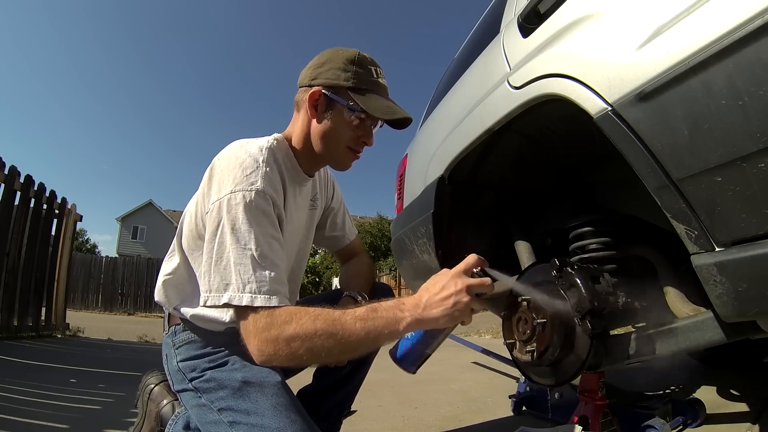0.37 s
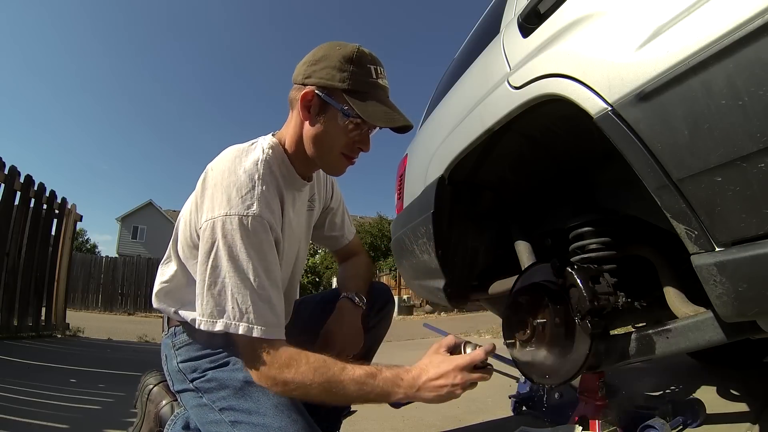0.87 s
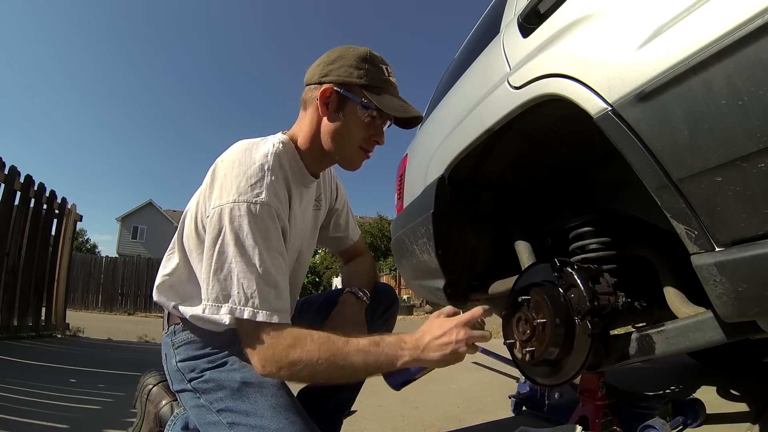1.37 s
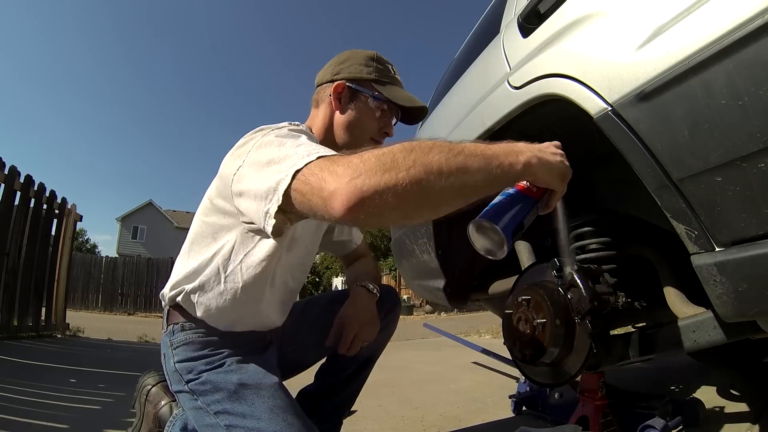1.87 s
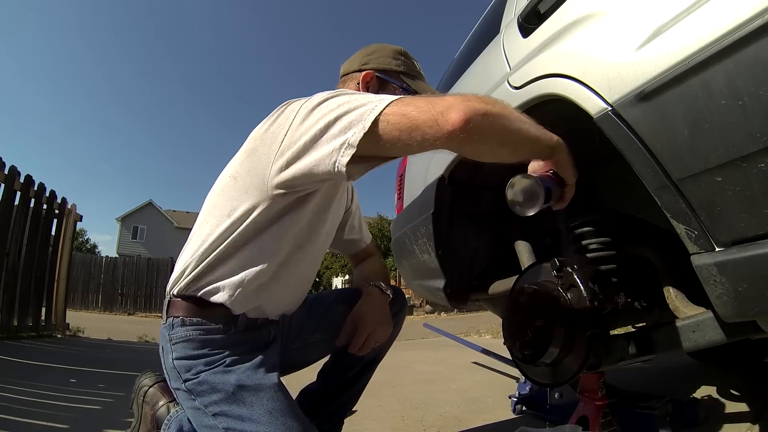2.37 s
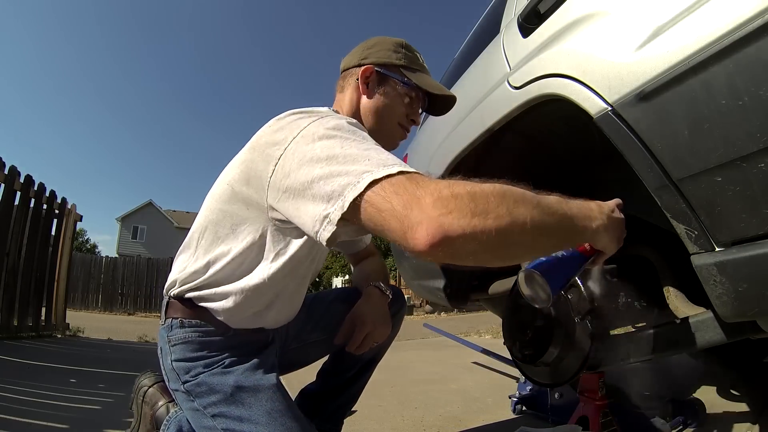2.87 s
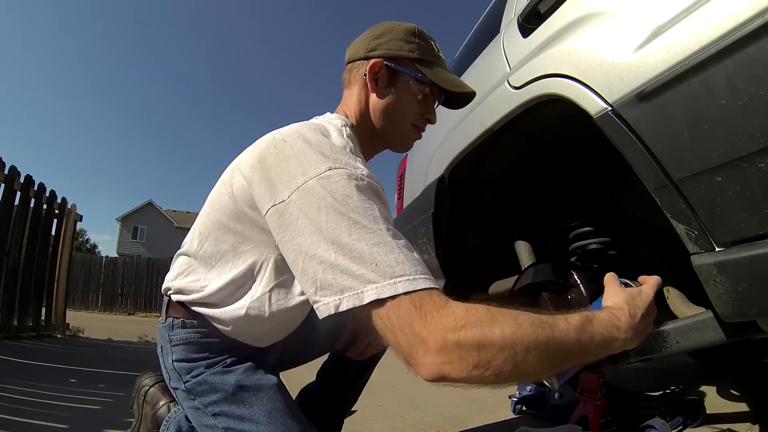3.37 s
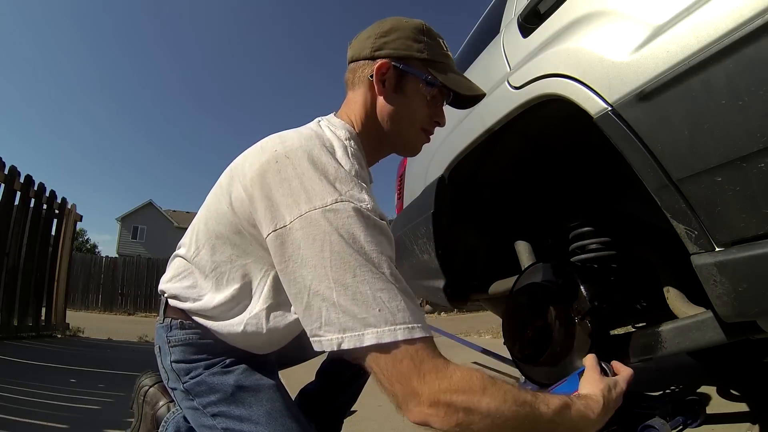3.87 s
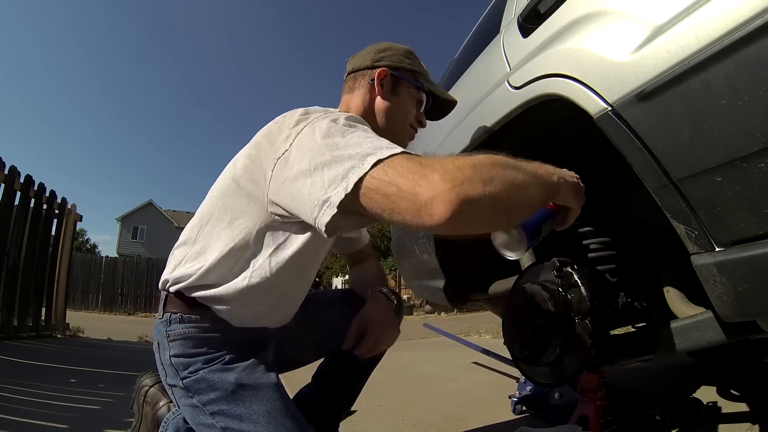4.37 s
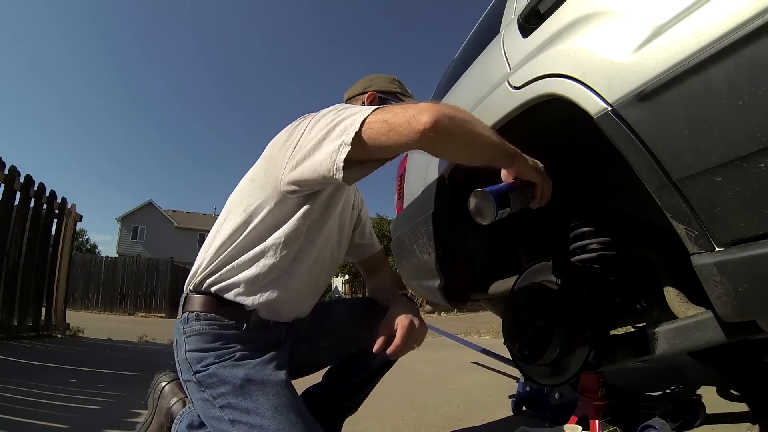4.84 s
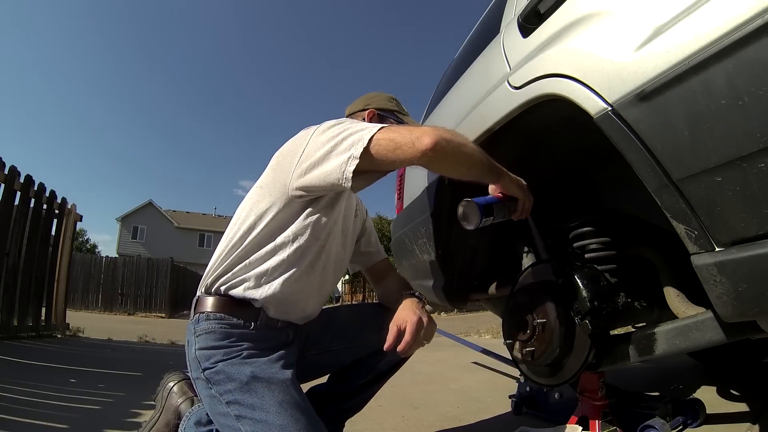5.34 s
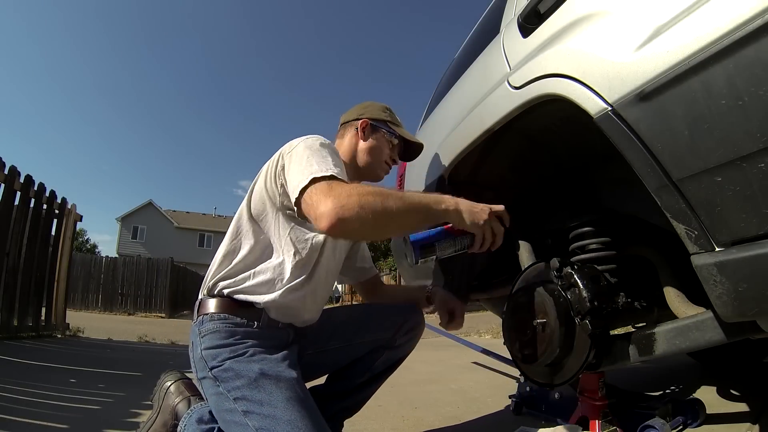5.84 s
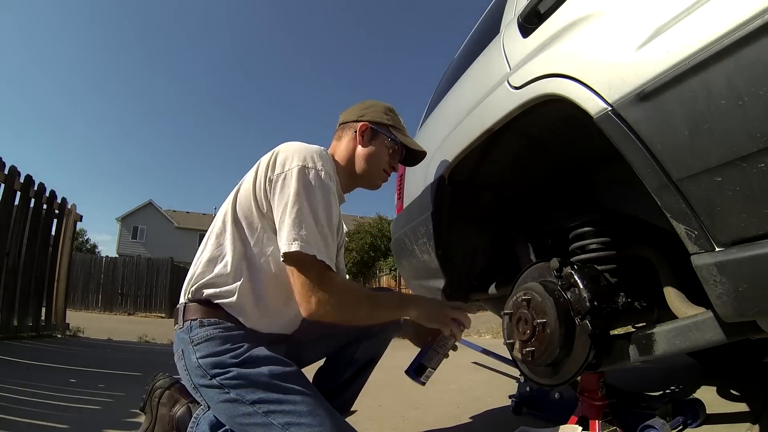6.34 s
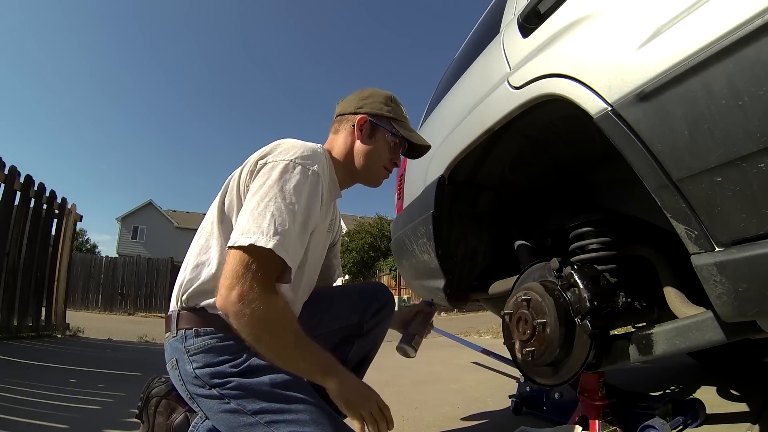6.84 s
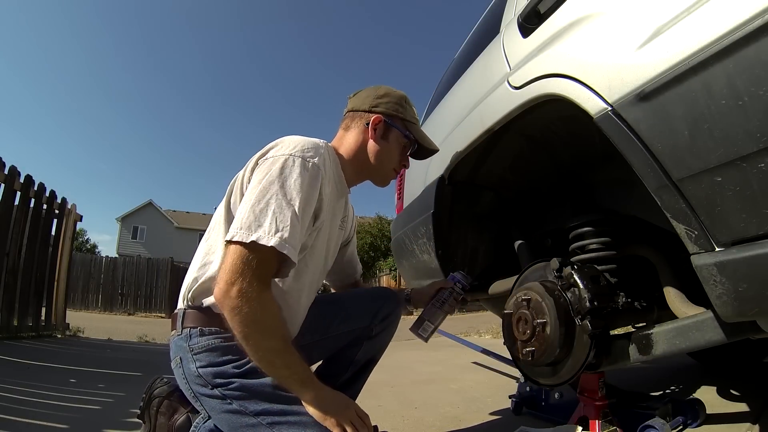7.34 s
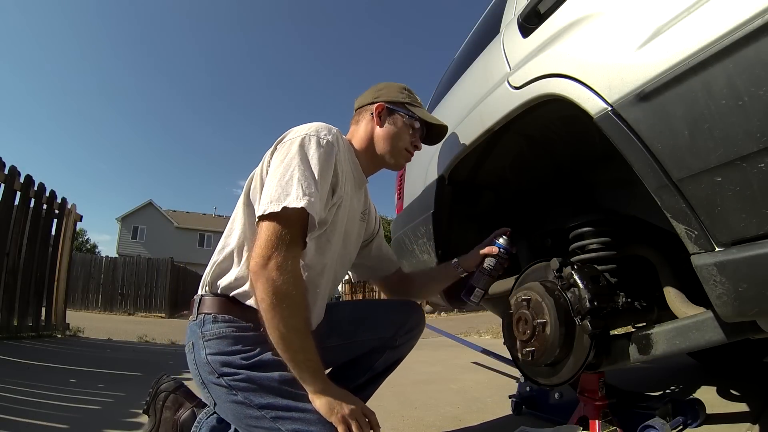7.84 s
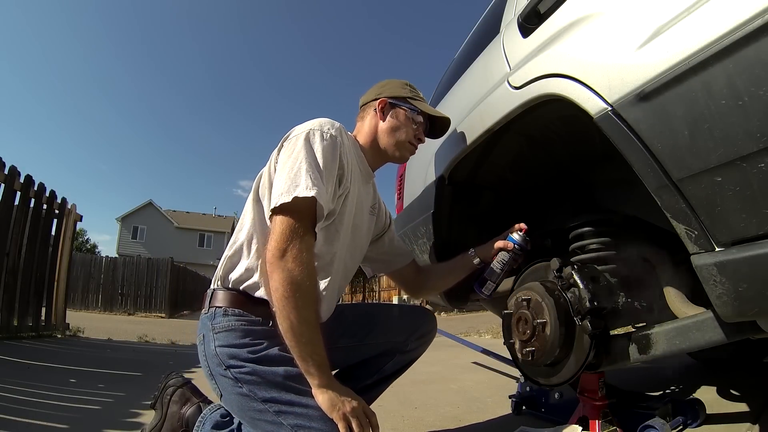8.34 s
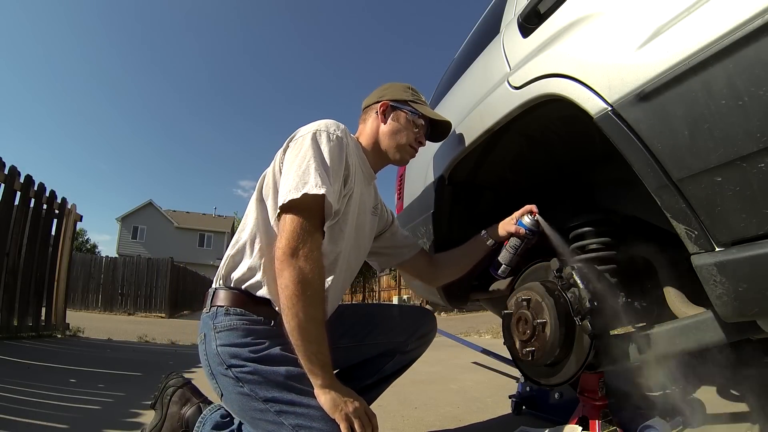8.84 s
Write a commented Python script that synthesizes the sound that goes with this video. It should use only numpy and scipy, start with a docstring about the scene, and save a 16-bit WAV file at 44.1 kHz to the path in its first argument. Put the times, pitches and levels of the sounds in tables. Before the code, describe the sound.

Close outdoors beside a car, an aerosol can sprays a metal brake in twelve rough hissing bursts, longer at first, then short and quick. The spray stops for small scrapes, a hard double crack, light knocks and cloth rustle, then a brief squirt and a half-second hiss finish. Faint chirps, far engine hum, low rumble and a thin camera whine lie behind.

```python
"""A hissing jet is heard first: an aerosol can sprays a car brake in fourteen bursts, modelled as band-filtered noise
that follows valve and gas, with splash, whistle and the ring of hollow metal. In a pause come two cracks and small
knocks (damped modes), scrapes and rustle (modulated noise), with decaying-noise echoes from wheel arch and house fronts.
Behind lie gliding bird notes, far engines, a trilling insect, town noise and the camera's whine and ticking."""
import sys
import numpy as np
from scipy import signal
from scipy.fft import rfft, irfft
from scipy.io import wavfile
from scipy.ndimage import uniform_filter1d

SR = 44100
rng = np.random.default_rng(int(sys.argv[2]) if len(sys.argv) > 2 else 0)


def unload_wav(signal):
    """Save mono or channel-first audio to the path in sys.argv[1] as 16-bit WAV at rate SR, clipped to [-1, 1]."""
    wavfile.write(
        sys.argv[1],
        SR,
        np.round(np.clip(np.atleast_2d(signal).T, -1, 1) * 32767).astype(np.int16),
    )


def field_ratio(decibels):
    """Amplitude ratio for a level in dB (20 dB per decade); scalars and array-likes work."""
    return 10 ** (np.asarray(decibels, dtype=float) / 20)


N = 406161
T = np.arange(N) / SR
HZ = np.fft.rfftfreq(N, 1 / SR)

# Presses of the valve: [fully open t/s, released t/s, relative jet level/dB, opening time/s]
VALVE_PRESSES = [(0.061, 0.467, -32.5, 0.0073), (0.586, 0.882, -30.5, 0.017), (1.01, 1.196, -30, 0.014),
                 (1.461, 1.646, -32, 0.019), (1.875, 2.374, -32.5, 0.02), (2.563, 2.997, -31.5, 0.014),
                 (3.186, 3.572, -30.5, 0.017), (3.748, 3.995, -31, 0.021), (4.43, 4.58, -29.5, 0.012),
                 (4.695, 4.82, -32, 0.0098), (5.06, 5.184, -32, 0.0094), (5.35, 5.516, -32.5, 0.013),
                 (8.182, 8.265, -32, 0.03), (8.447, 8.993, -32, 0.034)]
# What each press lands on: [splash re jet level/dB, ring of the hollow f/Hz, bass re splash level/dB,
# whistle of the jet f/Hz, whistle boost level/dB]
SPRAY_TARGETS = [(-7.5, 830, -3.5, 4380, 3.5), (-5, 840, -3, 4300, 4.5), (-5, 860, -2, 4400, 6.5),
                 (-6.5, 880, -2.5, 3800, 1.5), (-6.5, 620, 2.5, 4000, 0.5), (-7, 640, 0, 4200, -1),
                 (-7, 850, 2, 9400, 0.5), (-4.5, 920, -1.5, 5000, 1), (-9.5, 760, 0.5, 3900, 1.5),
                 (-6, 680, 4, 3640, 2.5), (-3, 760, -2, 4200, 2), (-7.5, 860, 1.5, 3040, 2.5),
                 (-6.5, 840, 0.5, 4700, -1.5), (-6, 700, 1.5, 3870, 1.5)]
# Gulps of propellant gas through the nozzle: [t/s, held t/s, rise of the treble level/dB]
GAS_GULPS = [(.12, .01, 8), (1.04, 0.02, 8.5), (1.14, 0.044, 8), (1.469, 0.016, 10), (1.9, 0.0084, 14),
             (2.66, .07, 10), (2.79, 0.026, 9), (3.278, 0.0094, 10), (3.33, 0.024, 8.5), (3.748, 0.14, 13),
             (3.891, 0.089, 11), (4.44, 0.0085, 7.5), (4.82, 0.013, 9.5), (5.068, 0.027, 12),
             (5.17, 0.026, 6), (5.472, 0.045, 11.5), (8.189, 0.02, 11), (8.27, 0.012, 11.5),
             (8.455, 0.067, 8)]
# Spectrum of the jet noise: [f/Hz, relative spectral level/dB]
SPRAY_SPECTRUM = [(60, -36), (90, -2), (170, -1.5), (434, -8), (800, -9.5), (1330, -12.5), (2100, -7.5),
                  (3900, -5), (5150, -8), (5900, -12), (8300, -7), (10100, -3.5), (12800, -13.5),
                  (15150, -19), (15600, -36)]
# Ranges of splash, jet and nozzle treble, one a row: [lower f/Hz, upper f/Hz]
SPRAY_ZONES = [(150, 1200), (2500, 5500), (7500, 13000)]
# Cracks, their echoes and small knocks: [t/s, relative level/dB, ring f/Hz]
BLOWS = [(2.483, -21, 3300), (5.002, -25, 1300), (5.035, -29, 900), (6.009, -24, 1200), (6.03, -25, 840),
         (6.1917, -2, 1840), (6.1963, 1.5, 1750), (6.214, -11, 1800), (6.222, -13, 1800),
         (6.249, -25, 1820), (6.364, -9, 2800), (6.384, -21, 2700), (6.417, -21, 2800), (6.48, -29, 1000),
         (6.494, -22, 2900), (6.84, -30, 4000), (6.846, -23, 1560), (6.8565, -19, 1980), (6.977, -27, 1560),
         (7.009, -24, 1100), (7.066, -27, 3900), (7.088, -32, 2900), (7.813, -33, 1100), (7.874, -29, 1400),
         (7.908, -28, 1400), (7.973, -28, 1500), (8.084, -33, 1300), (8.148, -29, 1350), (8.307, -25, 1200),
         (8.399, -28, 1400)]
# Modes of thin metal: [ratio to the ring frequency, relative level/dB]
METAL_MODES = [(.76, -13), (.955, -4), (1, 0), (1.13, -10), (1.24, -15)]
# Scrapes and brushes of hand, can and cloth: [t/s, decay t/s, noise level before the envelope/dB, centre f/Hz]
FRICTION = [(5.648, .03, -47, 1700), (5.828, .045, -46, 1500), (6.06, .035, -47, 3800),
            (6.283, .03, -48, 2600), (6.808, .03, -47, 3700), (6.43, .14, -49, 2900),
            (7.07, .04, -52, 3600)]
# Cloth, shoes on grit, drips: [t/s, level/dB]
RUSTLE_LEVEL = [(4., -74), (5.6, -55.5), (6.1, -60), (7.1, -51.5), (7.25, -89), (7.9, -72)]
# Clear bird notes, one list of points a note: [t/s, f/Hz, level/dB]
BIRD_NOTES = [
    [(.94, 4000, -50), (.975, 3950, -47), (1., 3680, -50)],
    [(1.22, 2850, -47), (1.254, 3150, -45), (1.375, 3145, -50)],
    [(2.4, 3780, -55), (2.465, 3740, -54)],
    [(2.49, 4800, -57), (2.52, 4600, -59), (2.55, 3650, -57)],
]
# Hoarse chirps of a second bird, one list of points a chirp: [t/s, f/Hz, level/dB]
HOARSE_CHIRPS = [
    [(1.385, 3700, -52), (1.41, 4100, -54), (1.45, 4200, -56)],
    [(1.76, 2900, -55), (1.85, 2950, -54)],
    [(2.43, 3000, -52), (2.457, 2870, -51)],
    [(3.03, 2900, -56), (3.17, 2900, -60)],
]
# A far car pulls away and changes gear: [t/s, firing f/Hz, level/dB]
CAR_DRONE = [
    [(3.95, 40.3, -29), (4.3, 51.35, -45), (4.7, 57.8, -37), (5.3, 59, -45), (6.3, 64, -53.5),
     (6.9, 69.1, -39.5), (7.2, 74.9, -63), (7.65, 77, -35), (8., 72.5, -47), (8.15, 59.7, -47),
     (8.6, 56, -40)],
]
# Low rumble of wind and traffic: [t/s, level/dB]
RUMBLE_LEVEL = [(0, -43), (2.35, -41.5), (3.7, -38.5), (4.1, -39), (4.4, -46), (9.21, -43.5)]
# Spectrum of the far town noise: [f/Hz, relative spectral level/dB]
TOWN_SPECTRUM = [(26, -36), (45, 2), (81, 4), (210, -13), (730, -18.5), (1310, -26.5), (2940, -30.5),
                 (4570, -33.5), (5420, -40), (8620, -46), (10500, -47), (11600, -44.5), (13700, -46),
                 (15500, -50)]
# Thin steady tones of the electronics: [f/Hz, level/dB]
STEADY_TONES = [(13189, -80)]

GULP_RISE_S, GULP_FADE_S = 0.011, 0.029
JET_SHARE, SPLASH_SHARE = 0.46, 0.45  # share of the gas rise that reaches jet and splash
NOZZLE_DB, SPURT_DB, SPURT_S = -6.5, 7, 0.012  # treble re jet; spurt that opens each press, and its fade
SPLASH_DB_PER_S = 7.5  # over the first second of a press
CLOSE_S = 0.012
HOLLOW_DB, HOLLOW_OCT = 5, 0.65  # boost and width of the cavity ring
WHISTLE_SPLIT, WHISTLE_OCT = 1.13, 0.2  # ratio of the two bands to their centre; width of each
PATTER_START_S, PATTER_END_S, PATTER_COUNT = 5.55, 8.4, 45
PATTER_DB, PATTER_HZ = -38, 1700  # centres of the random spread
SPIT_COUNT, SPIT_S = 4, 0.07  # drops after each release, their mean delay
HUM_HZ, HUM_DB = 77, -52
TOWN_DB = -47.5  # rms above 120 Hz
TRILL_HZ = 30  # mean pulse rate of the insect
TICK_HZ, TICK_START_S = 47.952, 0.0136
WHINE_HZ, WHINE_DB = 10655, -64.5  # level once the whine has risen


def spray():
    """Turbulent jet noise: half-octave bands follow valve and gas, sputter together and flicker alone."""
    sputter_db, flicker_db = 1.4, 0.8
    press, valve, zone_levels = controls()
    noise = coloured(SPRAY_SPECTRUM)
    zone_rms = [np.std(irfft(noise * (HZ > lo) * (HZ < hi), N)) for lo, hi in SPRAY_ZONES]
    # gains that bring each zone of the noise to its level
    splash_db, jet_db, nozzle_db = [db - 20 * np.log10(rms) for db, rms in zip(zone_levels, zone_rms)]
    gust_db = 1.43 * walk(12)  # the bass comes in gusts
    bass_db = np.array(SPRAY_TARGETS)[press, 2] + gust_db
    out = np.zeros(N)
    for hz in 62.5 * 2 ** (np.arange(17) / 2):
        # shares of splash, nozzle treble and bass in this band
        low = np.interp(np.log(hz), np.log([1200, 2500]), [1, 0])
        high = np.interp(np.log(hz), np.log([5000, 7500]), [0, 1])
        bass = np.interp(np.log(hz), np.log([250, 500]), [1, 0])
        db = low * splash_db + high * nozzle_db + (1 - low - high) * jet_db + bass * bass_db
        out += irfft(noise * bell(hz, 0.48), N) * field_ratio(db + flicker_db * walk(14))
    out += cavity_ring(noise, press) * field_ratio(splash_db)
    out += whistle(noise, press) * field_ratio(jet_db)
    return out * valve * field_ratio(sputter_db * walk(90))


def controls():
    """Flow control: the valve gates the flow, gas lifts the treble most, and wetting metal splashes more.

    Returns the press index, the valve opening and the levels/dB of splash, jet and nozzle treble."""
    opened, released, jet, open_s = np.transpose(VALVE_PRESSES)
    press = np.clip(np.searchsorted(opened - 0.05, T) - 1, 0, None)
    since = np.maximum(T - opened[press], 0)
    opening = np.clip(1 + (T - opened[press]) / open_s[press], 0, 1) ** 2
    closing = np.exp(-np.maximum(T - released[press], 0) / CLOSE_S)
    gas = SPURT_DB * np.exp(-since / SPURT_S)
    for s, held, db in GAS_GULPS:
        rise = np.clip(1 + (T - s) / GULP_RISE_S, 0, 1)
        fade = np.exp(-np.maximum(T - s - held, 0) / GULP_FADE_S)
        gas = np.maximum(gas, db * rise * fade)
    wet = np.array(SPRAY_TARGETS)[press, 0] + SPLASH_DB_PER_S * np.minimum(since, 1)
    rel_jet = np.array([wet + SPLASH_SHARE * gas, JET_SHARE * gas, NOZZLE_DB + gas])
    return press, opening * closing, jet[press] + rel_jet


def cavity_ring(noise, press):
    """Cavity resonance: the hollow behind each target boosts a band of the splash."""
    ring = np.zeros(N)
    for k, hz in enumerate(np.array(SPRAY_TARGETS)[:, 1]):
        ring += irfft(noise * bell(hz, HOLLOW_OCT), N) * (press == k)
    return ring * (field_ratio(HOLLOW_DB) - 1)


def whistle(noise, press):
    """Jet tone: a close pair of noise bands is raised or lowered for each target."""
    pair = np.zeros(N)
    for k, hz in enumerate(np.array(SPRAY_TARGETS)[:, 3]):
        bands = bell(hz / WHISTLE_SPLIT, WHISTLE_OCT) + bell(hz * WHISTLE_SPLIT, WHISTLE_OCT)
        pair += irfft(noise * bands, N) * (press == k)
    return pair * (field_ratio(np.array(SPRAY_TARGETS)[press, 4]) - 1)


def hollows(x):
    """Moving resonance: narrow modes of hub, drum and springs come and go as the jet sweeps over them."""
    depth_db, width_hz, hold_s = 2.7, 90, 0.15
    hz, s, z = signal.stft(x, SR, nperseg=1024)
    field = rng.standard_normal(z.shape)
    for axis, size in enumerate([width_hz / hz[1], hold_s / s[1]]):
        for _ in range(2):
            field = uniform_filter1d(field, int(size), axis=axis)
    depth = depth_db * np.clip(hz / 1500, 0, 1)[:, None]  # shallower in the bass
    return signal.istft(z * field_ratio(depth * field / field.std()), SR, nperseg=1024)[1][:N]


def wheel_arch(jet):
    """Early reverberation: the arch answers in another colour as the can moves from side to side."""
    side = 1.56 * walk(1.98)
    return field_ratio(-10.0) * (tail(jet * np.cos(side), 0.13, 14700) + tail(jet * np.sin(side), 0.22, 17000))


def knocks():
    """Impact and modal decay: a short snap with overtone, rattle, detuned metal modes and contact scrape."""
    width, rattle_db, rattle_t60 = 0.36, -19, 0.05  # relative bandwidth; decay/s at 2000 Hz
    ring_db, ring_t60, detune, overtone = -16, 0.075, 0.01, 0.15
    scrape_db, scrape_t60, growth = -27, 0.03, 0.7  # growth: scrape dB per blow dB
    rows = BLOWS + patter()
    out = np.zeros(N + SR)
    t = np.arange(SR // 5) / SR
    contact = signal.butter(2, [600, 4200], "band", fs=SR, output="sos")
    for (s, db, hz), noise in zip(rows, rng.standard_normal((len(rows), 2, len(t)))):
        tone = np.sin(2 * np.pi * hz * t) + overtone * np.sin(2 * np.pi * 1.96 * hz * t)
        snap = tone * hz * t * np.exp(1 - 2.1 * hz * t)  # about two cycles
        band = signal.butter(2, [hz * (1 - width / 2), hz * (1 + width / 2)], "band", fs=SR, output="sos")
        longer = (hz / 2000) ** 2  # thin bright parts rattle longer
        rattle = level(signal.sosfilt(band, noise[0]), rattle_db) * 1000 ** (-t / (rattle_t60 * longer))
        modes = np.zeros(len(t))
        for (ratio, mode_db), error in zip(METAL_MODES, noise[1]):
            modes += field_ratio(mode_db) * np.sin(2 * np.pi * hz * ratio * (1 + detune * error) * t)
        rattle += field_ratio(ring_db) * modes * 1000 ** (-t / (ring_t60 * longer))
        rattle *= field_ratio(min(db + 16, 0))  # light taps stay dry
        # the scrape grows less than the snap with a harder blow
        scrape = level(signal.sosfilt(contact, noise[1]), scrape_db + growth * db) * 1000 ** (-t / scrape_t60)
        start = int(s * SR)
        out[start:start + len(t)] += field_ratio(db) * (snap + rattle) + scrape
    return signal.sosfilt(signal.butter(2, [450, 5000], "band", fs=SR, output="sos"), out[:N])


def patter():
    """Random impacts: rows of faint knocks, grit and drips in the pause and drops shed after each press."""
    u = rng.random((PATTER_COUNT + SPIT_COUNT * len(VALVE_PRESSES), 3))
    grit_s = PATTER_START_S + (PATTER_END_S - PATTER_START_S) * u[:PATTER_COUNT, 0]
    delay_s = -SPIT_S * np.log(1 - u[PATTER_COUNT:, 0])
    drop_s = np.repeat(np.array(VALVE_PRESSES)[:, 1], SPIT_COUNT) + delay_s
    times = np.r_[grit_s, np.minimum(drop_s, T[-1])]
    return [(s, PATTER_DB + 12 * (size - 0.5), PATTER_HZ * 5 ** (pitch - 0.5))
            for s, (_, size, pitch) in zip(times, u)]


def house_fronts(jet, hits):
    """Late reverberation: a long dull tail returns from the house fronts."""
    return tail(field_ratio(-19.5) * jet + field_ratio(-21.5) * hits, 0.64, 3500)


def scrapes():
    """Dry friction: gritty band noise catches at once and eases off."""
    grit = rfft(rng.standard_normal(N) * field_ratio(3.5 * walk(500)))
    out = np.zeros(N)
    for s, length, db, hz in FRICTION:
        envelope = (T > s) * np.exp(-(np.maximum(T - s, 0) / length) ** 2)
        out += level(irfft(grit * bell(hz, 0.96), N), db) * envelope
    return out


def rustle():
    """Granular noise: dense scratchy grains come in uneven flurries."""
    grains = rng.standard_normal(N) * field_ratio(4 * walk(400) + 3 * walk(40))
    return level(irfft(rfft(grains) * bell(1120, 3.3), N), 0) * field_ratio(np.interp(T, *np.transpose(RUSTLE_LEVEL)))


def birds():
    """Frequency modulation: slight waver keeps one bird clear, fast deep waver makes the other hoarse."""
    return notes(BIRD_NOTES, 0.007, 0.004, 2.5, 120) + notes(HOARSE_CHIRPS, 0.012, 0.04, 5, 900)


def engines():
    """Periodic firing: a far car glides in pitch beside the hum of a steady far machine."""
    hum = [(0, HUM_HZ, HUM_DB), (N / SR, HUM_HZ, HUM_DB)]
    return notes(CAR_DRONE + [hum], 0.1, 0.025, 2.4, 9)


def insect():
    """Amplitude modulation: narrow noise near 5 kHz and its octave swells and fades in a trill."""
    song = np.zeros(N)
    for hz, db in [(5030, -66.0), (10100, -72.5)]:  # levels before the trill
        song += level(irfft(rfft(rng.standard_normal(N)) * bell(hz, 0.093), N), db)
    return song * field_ratio(3.1 * np.sin(2 * np.pi * TRILL_HZ * T + walk(3)))


def yard():
    """Superposition of distant sources: coloured town noise and a slowly varying low rumble."""
    noise = coloured(TOWN_SPECTRUM)
    town = irfft(noise, N) / np.std(irfft(noise * (HZ > 120), N)) * field_ratio(TOWN_DB)
    low = level(irfft(rfft(rng.standard_normal(N)) * bell(33.4, 0.64), N), 0)
    return town + low * field_ratio(np.interp(T, *np.transpose(RUMBLE_LEVEL)))


def camera():
    """Periodic excitation: a tick at twice the frame rate restarts a high whine over a steady tone."""
    since = (T - TICK_START_S) % (1 / TICK_HZ)
    whine = np.sqrt(2) * field_ratio(WHINE_DB) * np.sin(2 * np.pi * WHINE_HZ * since) * np.clip(since / 0.0029, 0, 1)
    hiss = irfft(rfft(rng.standard_normal(N) * np.exp(-since / 0.0022)) * bell(6740, 0.37), N)
    ping = np.sin(2 * np.pi * 2950 * since) * np.exp(-since / 0.00087)  # the same on every tick
    steady = sum(np.sqrt(2) * field_ratio(db) * np.sin(2 * np.pi * hz * T) for hz, db in STEADY_TONES)
    return whine + level(hiss, -70.5) + level(ping, -63.5) + steady


def notes(tables, edge, waver, throb_db, rate):
    """Frequency glide: near-sines with soft ends (edge/s), unsteady in pitch and level at rate/Hz."""
    out = np.zeros(N)
    drift = 1 + waver * walk(rate)
    throb = field_ratio(throb_db * walk(rate))
    for s, hz, db in map(np.transpose, tables):
        gate = np.clip(np.minimum(T - s[0], s[-1] - T) / edge, 0, 1)
        phase = 2 * np.pi * np.cumsum(np.interp(T, s, hz) * drift) / SR
        out += gate * field_ratio(np.interp(T, s, db)) * np.sin(phase)
    return np.sqrt(2) * throb * out


def tail(x, t60, dull_hz):
    """Diffuse reverberation: convolution with a decaying noise of energy 1 that lacks treble."""
    t = np.arange(int(t60 * SR)) / SR
    dull = signal.lfilter(*signal.butter(1, dull_hz, fs=SR), rng.standard_normal(len(t)))
    echo = dull * 1000 ** (-t / t60)
    return signal.fftconvolve(x, echo / np.sqrt(np.sum(echo ** 2)))[:N]


def coloured(points):
    """Spectral shaping: the spectrum of a noise that follows (f/Hz, level/dB) points."""
    hz, db = np.transpose(points)
    return rfft(rng.standard_normal(N)) * field_ratio(np.interp(np.log(HZ + 1), np.log(hz), db))


def bell(hz, octaves):
    """Band filtering: a raised cosine whose neighbours one width apart add up to 1."""
    return np.cos(np.pi / 2 * np.clip(np.log2((HZ + 1) / hz) / octaves, -1, 1)) ** 2


def walk(rate):
    """Slow random modulation: levels held 1 / rate s and slewed twice, with a spread near 1."""
    k = int(SR / rate)
    held = np.repeat(rng.standard_normal(N // k + 1), k)
    return 1.345 * uniform_filter1d(uniform_filter1d(held, k), k)[:N]


def level(x, db):
    """Root-mean-square scaling to a level/dB."""
    return x * field_ratio(db) / np.sqrt(np.mean(x ** 2))


def scene():
    """Superposition: direct sounds, their reflections and the background add at one microphone."""
    jet = field_ratio(-3.0) * hollows(spray())
    hits = knocks()
    near = jet + wheel_arch(jet) + hits + field_ratio(-11.5) * tail(hits, 0.069, 3500)
    handling = scrapes() + rustle()
    far = house_fronts(jet, hits) + birds() + engines() + insect() + yard()
    return np.tile(near + handling + far + camera(), (2, 1))  # two equal channels


def top_cut(x):
    """Nothing passes above the cut-off."""
    return signal.sosfilt(signal.butter(12, 15670, fs=SR, output="sos"), x)


def record(dry):
    """Signal chain: the finished mix of all sources goes through a single last stage."""
    return top_cut(dry)


dry = scene()
out = record(dry)
unload_wav(out)
```